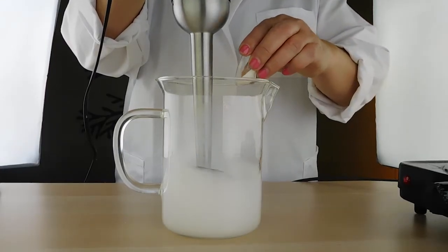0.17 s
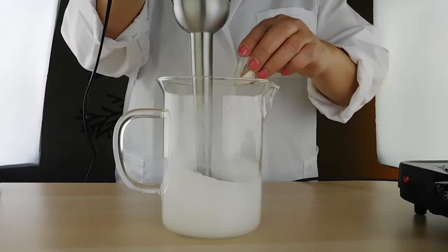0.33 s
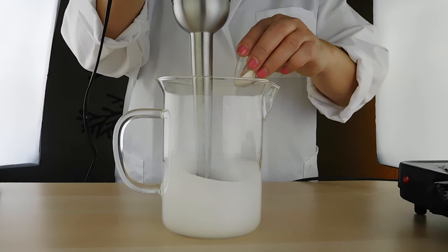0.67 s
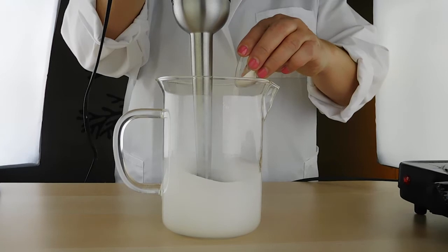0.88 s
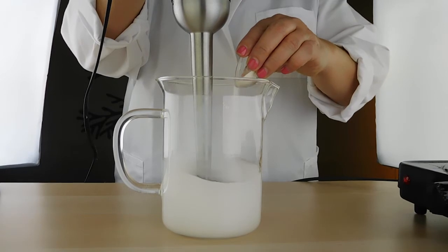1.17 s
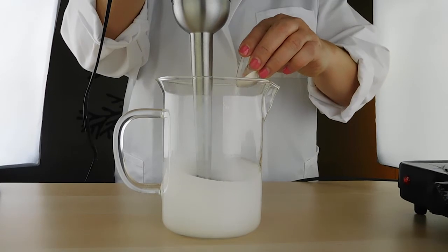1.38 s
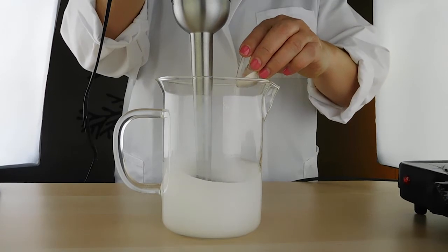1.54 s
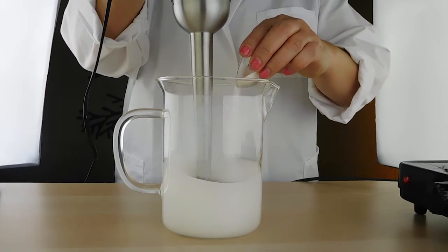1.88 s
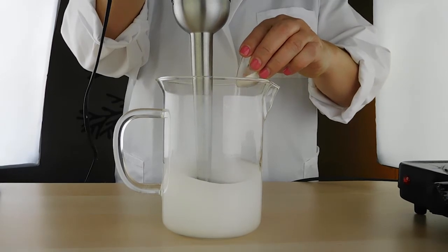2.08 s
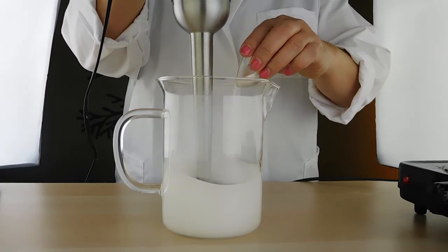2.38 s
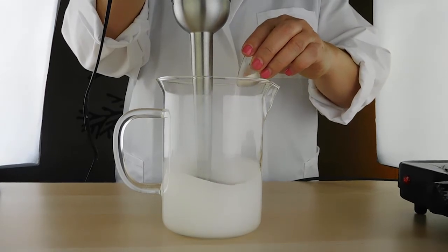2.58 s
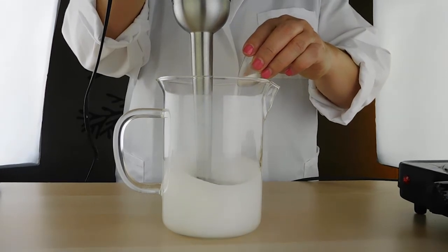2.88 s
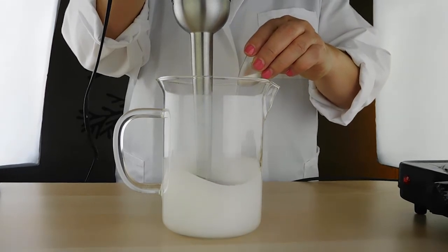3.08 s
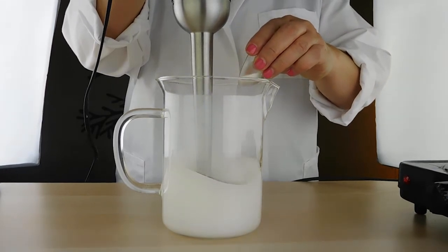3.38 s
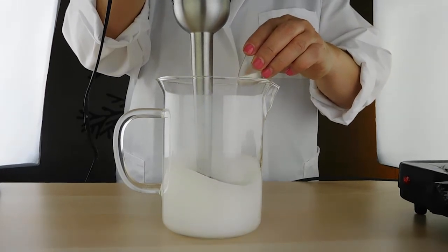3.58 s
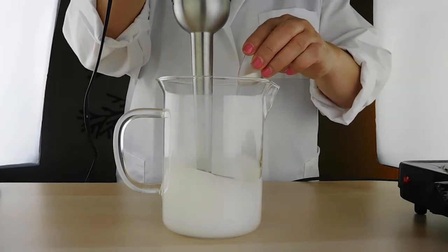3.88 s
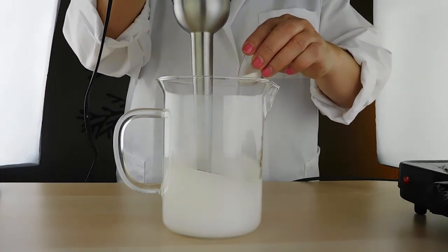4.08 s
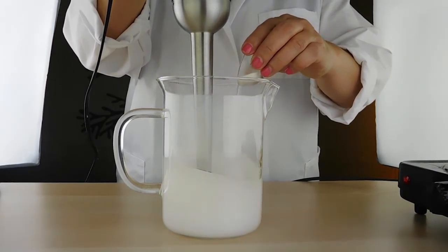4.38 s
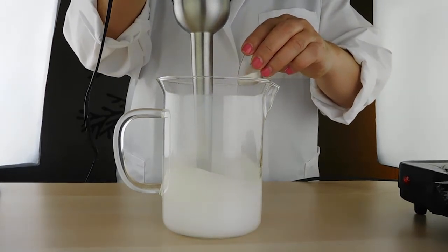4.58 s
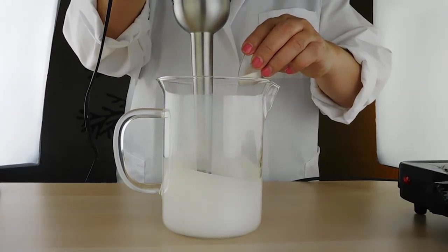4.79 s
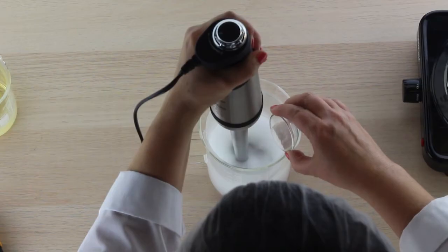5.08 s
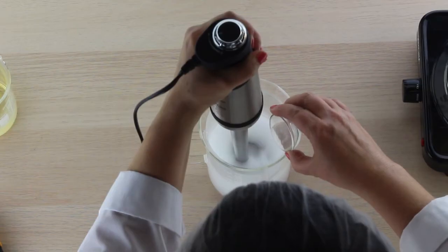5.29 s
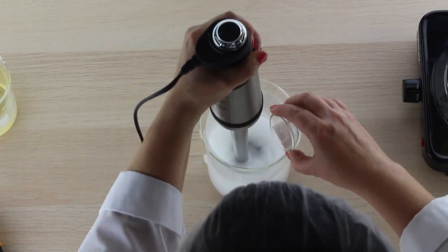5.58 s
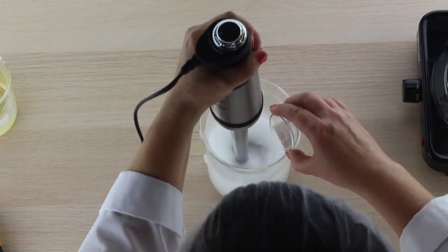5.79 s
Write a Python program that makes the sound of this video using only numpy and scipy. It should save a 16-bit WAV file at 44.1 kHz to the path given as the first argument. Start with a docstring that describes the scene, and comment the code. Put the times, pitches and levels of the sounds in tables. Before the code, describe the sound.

A stick blender runs without pause, close up, in a glass beaker of thin liquid in a fairly dry room. Its drone is centred on about 118 turns a second, with strong tones near 590 and 700 Hz, sagging slightly to about 116. From 0 to 0.9 seconds, short sputtering bursts of metallic crackle come over sloshing and splashing; from about 0.9 to 3.1 they become denser and almost continuous, gritty and bright, with sharper snaps near 0.2, 1.1 and 2.95. The drone surges around 0.7, 1.9 and 2.9. At about 3.1 the crackle disappears and the sound becomes smoother and quieter: beating motor hum, fluttering high whine near 2.8 and 5.5 kHz, fine brush buzz and steady hiss. Soft boomy gulps occur near 3.6 and 4.0, and the drone and churning swell again around 4.6 to 4.8. The motor is still running at 5.9 seconds.

```python
"""Stick blender in a glass beaker

A stick blender churns a thin emulsion: multiples of its shaft speed drone and knock, and noise splashes.
For about three seconds cavities collapse in once-a-turn sprays of clicks that ring the steel guard.
The motor hums and beats against the mains, commutator bars whistle, brushes buzz every turn and hiss.
Tones are sines locked to one shaft angle; the liquid and hiss are coloured noise."""
import sys
import numpy as np
from scipy import signal
from scipy.fft import rfft, irfft, next_fast_len
from scipy.io import wavfile
from scipy.ndimage import uniform_filter1d, minimum_filter1d, map_coordinates

SR = 44100
rng = np.random.default_rng(int(sys.argv[2]) if len(sys.argv) > 2 else 0)


def unload_audio(sound):
    """Save the sound as a 16-bit wav file, at the path given as the first command line argument."""
    columns = np.transpose(np.atleast_2d(sound))
    # keep every value between -1 and 1, then stretch to whole-number steps
    steps = np.round(np.clip(columns, -1, 1) * 32767)
    wavfile.write(sys.argv[1], SR, steps.astype(np.int16))


N = 261954
TIME = np.arange(N) / SR
SLOSH_SETTLE_S = 2.9  # the slosh and the rocking of the shaft die down over this time

# Gains of motor and blade: (time [s], hum gain [dB], brush and whine gain [dB], blade knock gain [dB])
CARRY = [(0, -10, -0.5, -31), (.7, -8, -1, -28), (1.1, -2.5, -5, -23), (1.9, -8, -2.5, -24),
         (2.8, -2, 1.5, -22), (3.25, 0.5, 5, -35.5), (5.94, 0, 5, -36.5)]


def from_db(db):
    """Amplitude ratio: twenty decibels are a factor of ten."""
    return 10 ** (np.asarray(db) / 20)


def rms_one(x):
    """Normalisation to unit root-mean-square amplitude."""
    return x / np.sqrt(np.mean(x ** 2) + 1e-20)


def in_time(rows):
    """Linear interpolation of each column of a curve at every sample."""
    times, *columns = np.transpose(rows)
    return [np.interp(TIME, times, column) for column in columns]


def at_hz(points, hz):
    """Interpolation of a spectrum along a logarithmic frequency axis."""
    known, values = np.transpose(points)
    return np.interp(np.log(hz + 1), np.log(known), values)


def drift(rate):
    """Low-pass random process of unit rms: a double pole at `rate` Hz, computed every 40 samples."""
    step = 40
    r = np.exp(-2 * np.pi * rate * step / SR)
    noise = rng.standard_normal(N // step + 2002)
    slow = signal.lfilter([1], [1, -2 * r, r * r], noise)[2000:]  # drop the onset of the filter
    return np.interp(np.arange(N) / step, np.arange(len(slow)), rms_one(slow))


def colour(x, spectrum):
    """Spectral shaping by multiplication in the frequency domain; unit rms."""
    size = next_fast_len(N)
    gain = from_db(at_hz(spectrum, np.fft.rfftfreq(size, 1 / SR)))
    return rms_one(irfft(rfft(x, size) * gain, size)[..., :N])


def stereo_noise():
    """Partly coherent white noise: mid and side signals set the correlation between the channels."""
    # Coherence of the channels: (frequency [Hz], correlation [1])
    coherence = [(30, 0.37), (100, 0.46), (700, 1), (1500, 0.9), (3000, 0.57), (8000, 0.17), (14000, 0.15)]
    size = next_fast_len(N)
    mid, side = rfft(rng.standard_normal((2, size)))
    alike = np.clip(at_hz(coherence, np.fft.rfftfreq(size, 1 / SR)), 0, .998)
    channels = np.sqrt(1 + alike) * mid + np.sqrt(1 - alike) * side * [[1], [-1]]
    return rms_one(irfft(channels, size)[:, :N])


def resonance(x, hz, width):
    """Two-pole resonator of near-unit gain at its peak; the pole radius sets the bandwidth."""
    r = np.exp(-np.pi * width / SR)
    poles = [1, -2 * r * np.cos(2 * np.pi * hz / SR), r * r]
    return (1 - r * r) / 2 * signal.lfilter([1, 0, -1], poles, x + 1e-18)


def resonate(x, modes):
    """Modal superposition: parallel resonances with alternating signs."""
    out = 0
    for k, (hz, width, db) in enumerate(modes):
        out = out + (-1) ** k * from_db(db) * resonance(x, hz, width)
    return out


def ring_through(x, modes):
    """Resonances in cascade: each in turn lifts its own band and rings on."""
    for hz, width, db in modes:
        x = x + (from_db(db) - 1) * resonance(x, hz, width)
    return x


def throb(angle, depth_db):
    """Periodic amplitude modulation: a gain of unit rms that swells once a cycle."""
    return rms_one(from_db(depth_db * np.cos(angle)))


def gate(start, length, edge):
    """Trapezoidal envelope: a rise over `edge` seconds, a hold, an equal fall."""
    return np.clip(np.minimum(TIME - start, start + length - TIME) / edge + .5, 0, 1)


def tone(angle, waver, rate):
    """Sine of unit rms with random modulation of its in-phase and quadrature parts by the share `waver`."""
    phase = angle + rng.uniform(0, 2 * np.pi)
    in_phase = (1 + waver * drift(rate)) * np.cos(phase)
    quadrature = waver * drift(rate) * np.sin(phase)
    return rms_one(in_phase + quadrature)


def shaft_angle():
    """Rotational kinematics: the angle [rad] is the integral of a sagging, slightly unsteady speed."""
    # Mean shaft speed, sagging as the mix thickens: (time [s], speed [turns/s])
    mean_speed = [(0, 118.45), (.6, 118.25), (.86, 117.6), (1.4, 117.9), (2.0, 117.25), (2.26, 117.4),
                  (2.5, 116.65), (3.06, 116.6), (3.32, 115.6), (4.48, 115.95), (4.68, 116.6),
                  (4.95, 115.85), (5.94, 116.0)]
    speed, = in_time(mean_speed)
    unrest = .08 * drift(4)  # turns/s
    return 2 * np.pi * np.cumsum(speed + unrest) / SR


def blade(angle):
    """Periodic forcing: the blade pushes the liquid every turn and sounds multiples of the shaft speed."""
    # Drone before the surges: (time [s], 5th multiple level [dB], 6th multiple level [dB])
    drone_levels = [(0, -32, -20.5), (.6, -28, -18.5), (1.0, -24, -27.5), (1.45, -25.5, -30),
                    (1.56, -28.5, -23.5), (2.45, -20, -22.5), (3.15, -24, -18), (3.24, -39, -21),
                    (4.2, -35, -27), (5.94, -35.5, -25)]
    # The blade grips the liquid and the balance of the drone shifts:
    # (start [s], length [s], 5th multiple lift [dB], 6th multiple lift [dB])
    surges = [(0.716, 0.063, 9.5, -18), (1.928, 0.33, -3.5, 8), (2.854, 0.33, 2.5, 2.5),
              (4.558, 0.24, 10.5, 6.5)]
    # Knock: (multiple of the shaft speed [1], relative level [dB])
    knock_multiples = [(4, -13), (7, -7), (9, -8.5), (10, -17), (11, -7.5), (12, -15), (13, -19.5),
                       (14, -22.5)]

    fifth_db, sixth_db = in_time(drone_levels)
    for start, length, fifth_lift_db, sixth_lift_db in surges:
        surge = gate(start, length, edge=.05)
        fifth_db = fifth_db + fifth_lift_db * surge
        sixth_db = sixth_db + sixth_lift_db * surge
    fifth = from_db(fifth_db) * tone(5 * angle, waver=.23, rate=13)
    sixth = from_db(sixth_db) * tone(6 * angle, waver=.13, rate=20)
    knock = sum(from_db(db) * tone(k * angle, waver=.48, rate=9.4) for k, db in knock_multiples)
    knock_gain_db = in_time(CARRY)[2]
    return fifth + sixth + from_db(knock_gain_db) * knock


def liquid(angle):
    """Turbulence noise: eddies chopped by the blade boom in the beaker, with slosh below and splash above."""
    # Stirring: (time [s], churn level before the gulps [dB], mean splash level [dB])
    stirring = [(0, -18, -25.5), (.45, -19.5, -26.5), (1.0, -20, -23.5), (1.48, -19, -23),
                (1.6, -23.5, -24.5), (1.87, -19, -23), (2.0, -27, -26), (2.35, -21.5, -25),
                (3.05, -23, -25.5), (3.22, -31.5, -30), (3.7, -26, -28.5), (4.15, -28, -28.5),
                (4.6, -21.5, -26), (4.9, -25.5, -27.5), (5.35, -23.5, -27), (5.94, -27.5, -29.5)]
    # The vortex gulps air and booms: (time [s], lift [dB], half length [s])
    gulps = [(0.994, 11, 0.018), (2.505, 7, 0.011), (3.589, 8, .016), (4.03, 8, 0.025)]
    # Resonances of beaker and liquid: (frequency [Hz], width [Hz], relative level [dB])
    beaker_modes = [(535, 213, -8), (631, 137, -2), (691.2, 41.8, 0), (821, 19, -11)]
    # Deep slosh: (frequency [Hz], relative density [dB per Hz])
    slosh_spectrum = [(25, -50), (90, -9), (170, 3.5), (260, 7.5), (330, 16), (450, 18), (560, 19.5),
                      (800, -27)]
    # Splash: (frequency [Hz], relative density [dB per Hz])
    splash_spectrum = [(60, -41), (700, -3), (880, -1.5), (940, -0.5), (1130, -2.5), (1270, 3), (1350, -5),
                       (1440, 1.5), (1800, -7.5), (2080, -3), (2500, -8), (2680, -6), (2950, -14),
                       (9000, -34)]
    # Eddies: (frequency [Hz], relative density [dB per Hz])
    eddy_spectrum = [(150, -51), (450, -5.5), (850, 4.5), (1300, -16), (4000, -40)]

    churn_db, splash_db = in_time(stirring)
    churn_db = churn_db + sum(db * np.exp(-((TIME - s) / length) ** 2) for s, db, length in gulps)
    slosh_db = np.interp(TIME, [0, SLOSH_SETTLE_S], [-23, -36.5])  # dies down as the mix thickens
    chopped = colour(stereo_noise(), eddy_spectrum) * throb(angle, depth_db=1.5)
    eddies = chopped * from_db(1.2 * drift(24) + 1.2 * drift(8))
    churn = rms_one(resonate(eddies, beaker_modes))
    slosh = colour(stereo_noise(), slosh_spectrum) * from_db(1.36 * drift(9.4))
    splash = colour(stereo_noise(), splash_spectrum) * from_db(1.25 * drift(29))
    return from_db(churn_db) * churn + from_db(slosh_db) * slosh + from_db(splash_db) * splash


def cavitation(angle, per_s, spread_db, uneven_db):
    """Cavitation: once a turn the cavity behind the blade collapses in random clicks that ring the guard."""
    # Spells at the blade tips: (start [s], length [s], level before ringing [dB], swell over the spell [dB])
    spells = [(0, 0.044, -41, -3), (0.101, .045, -43, 2), (0.16, 0.041, -40, 3), (0.235, 0.096, -38, -2),
              (0.373, 0.079, -39, -1), (.49, 0.095, -37.5, 3), (0.627, 0.021, -37, 0),
              (.675, 0.09, -37, -4.5), (0.804, 0.061, -33.5, -2.5), (0.882, 0.212, -34.5, -1.5),
              (1.09, .845, -34.5, 1.5), (1.966, 0.11, -35, -8), (2.119, 0.125, -37.5, -4),
              (2.243, 0.32, -32, -0.5), (2.582, 0.51, -33, -7), (3.1, .06, -50, -2)]
    # Hardest single collapses: (time [s], level before ringing [dB])
    snap_levels = [(.159, -24.5), (1.1117, -25), (1.7833, -29), (2.747, -32), (2.9422, -29), (2.9666, -26)]
    # Clicks: (frequency [Hz], relative density [dB per Hz])
    click_spectrum = [(100, -25), (1500, 5), (2700, -1.5), (4200, -3.5), (6000, -1.5), (8400, -4),
                      (11000, -6), (15000, -7.5)]
    # Resonances of steel shaft and blade guard: (frequency [Hz], width [Hz], lift of each stage [dB])
    guard_modes = [(2670, 70, 9), (3380, 200, 8), (4220, 95, 19), (5010, 220, 6.5), (5980, 110, 8),
                   (6450, 300, 7), (7150, 300, 7), (8350, 220, 12), (9450, 160, 9), (9900, 200, 6),
                   (11000, 200, 10), (13050, 160, 8), (14000, 170, 7)]
    rise, fall = .38, .3  # shares of a turn
    fizz = .12  # floor between collapses, relative to a typical collapse peak
    snap_decay_s = .0029

    level = 0
    for start, length, db, swell_db in spells:
        progress = np.clip((TIME - start) / length, 0, 1)
        level = level + from_db(db + swell_db * progress) * gate(start, length, edge=.016)
    level = level * from_db(1.3 * drift(16))

    turn, part = np.divmod(angle / (2 * np.pi) + .05 * drift(60), 1)
    luck = np.clip(rng.standard_normal(1000), -2, 1.5)  # one draw for each turn
    height = from_db(uneven_db * luck[turn.astype(int)])
    shape = np.minimum(part / rise, np.exp((rise - part) / fall))
    collapses = level * rms_one(fizz + height * shape)
    snaps = sum(from_db(db) * (TIME >= s) * np.exp(-np.abs(TIME - s) / snap_decay_s)
                for s, db in snap_levels)

    born = rng.random(N) < per_s / SR
    sizes = from_db(spread_db * np.minimum(rng.exponential(1, N), 3)) * rng.choice([-1, 1], N)
    clicks = colour(born * sizes, click_spectrum)
    return ring_through(clicks * (collapses + snaps), guard_modes)


def motor(angle):
    """Unbalance and beats: uneven drag shakes the shaft; hum near its multiples beats against them."""
    # Shaking of the shaft: (time [s], once-a-turn level [dB], twice-a-turn level [dB])
    shaking = [(0, -40, -29.5), (.55, -40, -27), (1.15, -44, -27), (1.4, -54.5, -35), (1.8, -49, -31),
               (2.25, -43.5, -40), (2.6, -42, -31), (3.0, -37, -42.5), (5.94, -36, -39)]
    # Magnetic hum: (multiple of the mains [1], multiple of the shaft speed [1], relative level [dB])
    hum_parts = [(4, 0, -39), (4, 1, -35), (0, 3, -38), (4, 2, -39), (0, 4, -37.5), (0, 7, -43)]
    mains_hz = 60

    once_db, twice_db = in_time(shaking)
    once = from_db(once_db) * tone(angle, waver=.06, rate=8)
    twice = from_db(twice_db) * tone(2 * angle, waver=.14, rate=4)
    # Uneven drag of the sloshing liquid rocks the shaft once a turn
    rocking_db = np.interp(TIME, [0, SLOSH_SETTLE_S], [-47, -54])
    rocking = from_db(rocking_db) * tone(angle, waver=2, rate=6)
    mains = 2 * np.pi * mains_hz * TIME
    hum = sum(from_db(db) * tone(m * mains + k * angle, waver=.11, rate=4) for m, k, db in hum_parts)
    hum_gain_db = in_time(CARRY)[0]
    return once + rocking + twice + from_db(hum_gain_db) * hum


def commutator(angle, flutter_db, wander):
    """Bar-passing tones with sidebands: 24 bars a turn give clusters of fluttering whistles."""
    # Bar tones and once-a-turn sidebands: (multiple of the shaft speed [1], relative peak level [dB])
    whistles = [(23, -49.2), (24, -40.7), (42, -62.5), (43, -51.9), (44, -56.5), (45, -50.3), (46, -57.8),
                (47, -46.8), (48, -54.7), (49, -46.7), (50, -58.8), (51, -54.9), (52, -59.0), (62, -59.3),
                (72, -52.9), (73, -62.6), (81, -63.3), (83, -56.7), (84, -58.9), (86, -61.5), (95, -63.3),
                (96, -57.0), (97, -61.3), (117, -62.5), (118, -58.1), (119, -57.0)]
    whine = 0
    for k, db in whistles:
        start = rng.uniform(0, 2 * np.pi)
        lead = rng.choice([-1, 1]) * rng.uniform(.4, .75)  # radians: opposite shifts in the two channels
        phase = k * angle + start + wander * drift(17) + lead * np.array([[1], [-1]])
        whine = whine + from_db(db + flutter_db * drift(18)) * np.cos(phase)
    return whine * from_db(in_time(CARRY)[1])


def brushes(angle):
    """Sliding friction: a worn track repeats every turn as a fine buzz over a steady hiss."""
    # Brush noise: (frequency [Hz], relative density [dB per Hz])
    brush_spectrum = [(1500, 0.5), (2700, 6), (3400, 7.5), (4600, 2), (5500, -1), (6400, 2), (8000, -3.5),
                      (10000, -1.5), (11100, 6.5), (12000, -11), (13000, -2), (13800, -2.5), (14700, 6),
                      (15700, -20)]
    track = rng.standard_normal((2, 380))  # roughness at 380 places around the turn
    place = angle / (2 * np.pi) * track.shape[1]
    common, apart = [map_coordinates(row, [place], order=3, mode="grid-wrap") for row in track]
    buzz = colour(common + apart * np.array([[1], [-1]]), brush_spectrum)
    hiss = colour(stereo_noise(), brush_spectrum)
    buzz_gain_db = in_time(CARRY)[1]
    return from_db(-44.5 + buzz_gain_db) * buzz + from_db(-38.5) * hiss


def room(x, t60, count=70):
    """Image sources: decaying reflections from beaker, table and walls, with unit total energy per ear."""
    out = np.zeros((2, N))
    for ear in out:
        delays = .06 * rng.random(count) ** 1.5 + .002  # seconds, crowded towards the early end
        gains = from_db(-60 * delays / t60) * rng.choice([-1, 1], count)
        gains = gains / np.linalg.norm(gains)
        for lag, gain in zip((delays * SR).astype(int), gains):
            ear[lag:] += gain * x[:-lag]
    return out


def room_rumble():
    """Background noise: low-frequency noise of the room with a fixed spectrum."""
    # Rumble: (frequency [Hz], relative density [dB per Hz])
    rumble_spectrum = [(10, -9), (30, -2), (70, 4), (120, 7), (300, -20), (1000, -50)]
    return from_db(-79) * colour(stereo_noise(), rumble_spectrum)


def limiter(x, ceiling):
    """Peak limiting: the gain ducks smoothly around any peak above the ceiling."""
    window = SR // 200  # 5 ms
    allowed = ceiling / np.maximum(np.abs(x).max(axis=0), ceiling)
    return x * uniform_filter1d(minimum_filter1d(allowed, size=window), size=window)


def scene():
    """Superposition: one shaft angle drives the machine, with reflections and rumble around it."""
    angle = shaft_angle()
    tones = blade(angle) + motor(angle)
    tones = tones + from_db(-21) * room(tones, t60=.3)
    crackle = cavitation(angle, per_s=12000, spread_db=4.0, uneven_db=3.5)
    crackle = crackle + from_db(-1.5) * room(crackle, t60=.055)
    whine = commutator(angle, flutter_db=1.94, wander=.35)
    mix = tones + liquid(angle) + crackle + whine + brushes(angle) + room_rumble()
    return mix * from_db([[.45], [-.45]])  # left a little louder than right


def record(dry):
    """Band limitation: peaks are held down, then a steep elliptic low-pass cuts the top."""
    cutoff_hz = 15700
    held = limiter(dry, ceiling=.56)
    low_pass = signal.ellip(10, .1, 90, cutoff_hz, fs=SR, output="sos")
    return signal.sosfilt(low_pass, held)


dry = scene()
out = record(dry)
unload_audio(out)
```